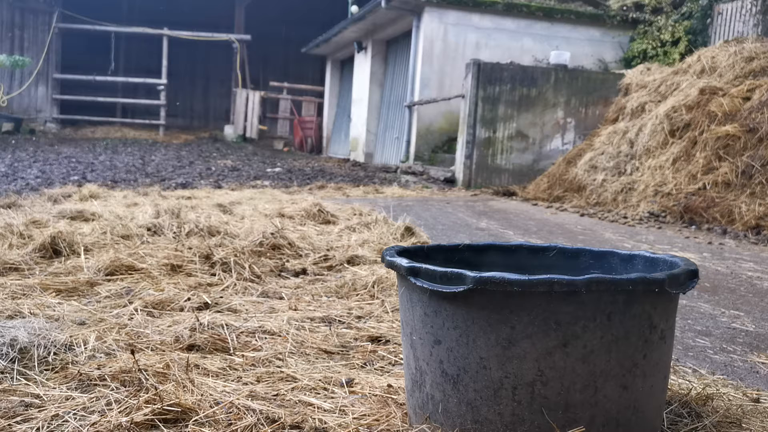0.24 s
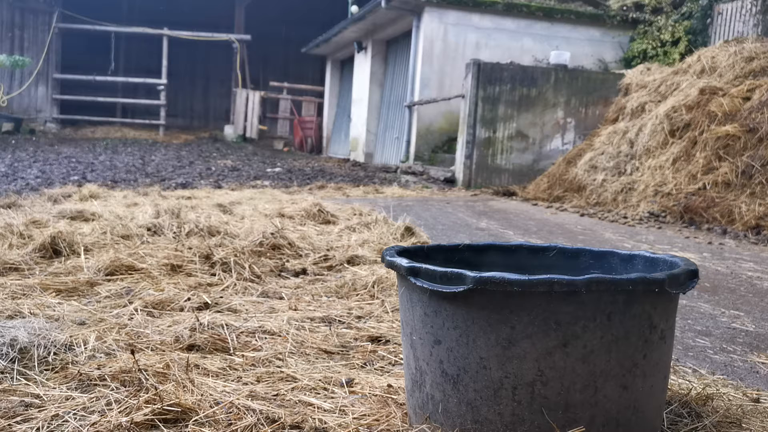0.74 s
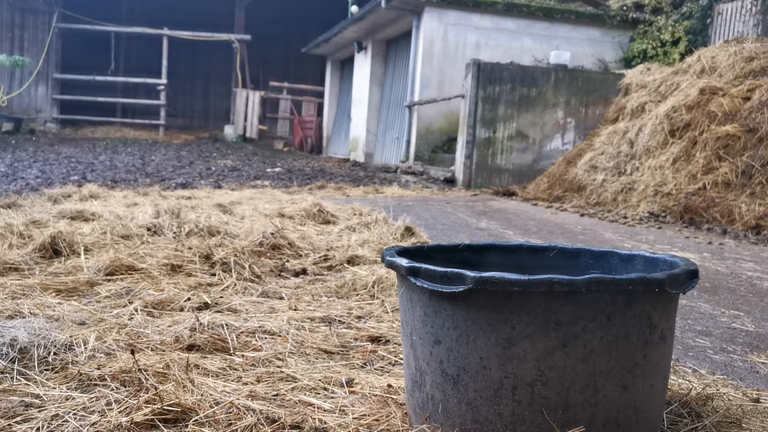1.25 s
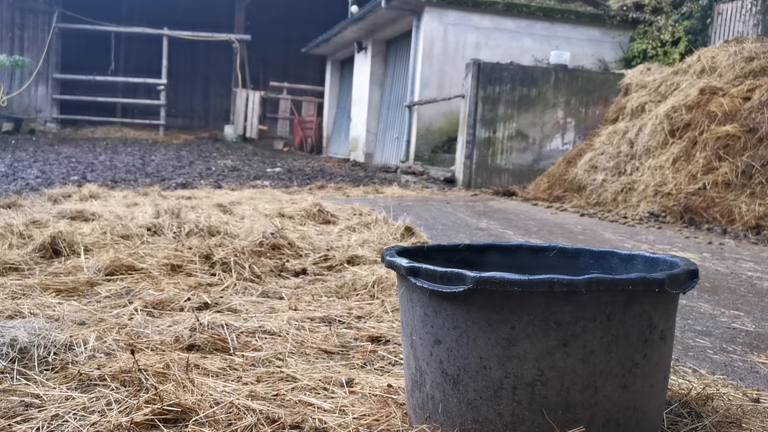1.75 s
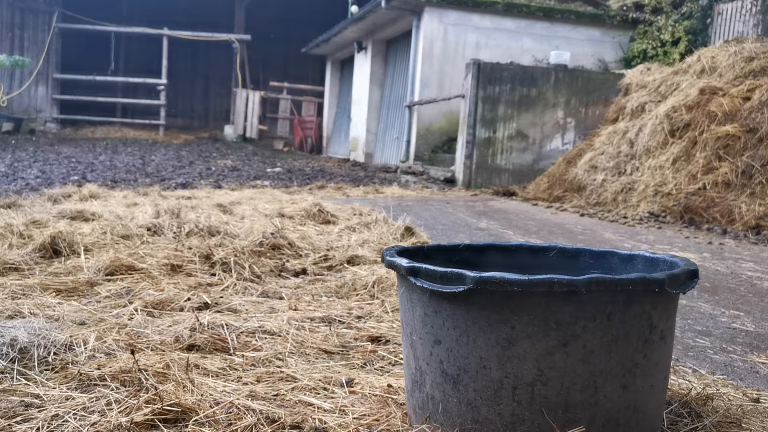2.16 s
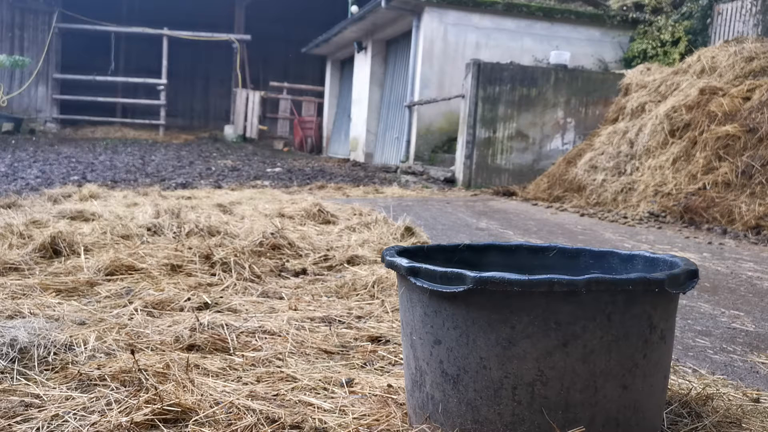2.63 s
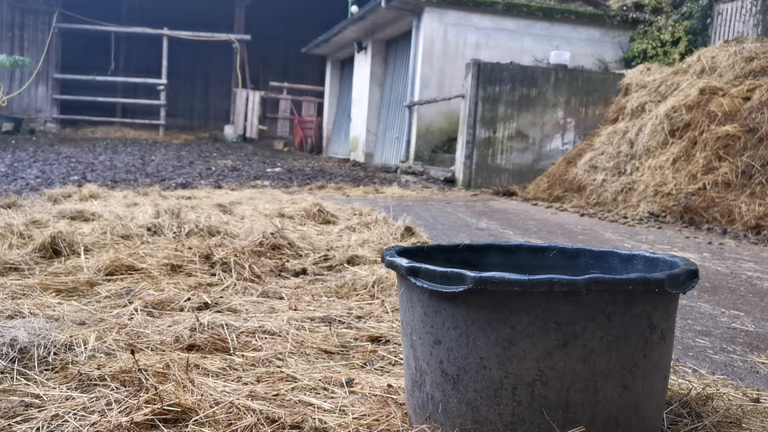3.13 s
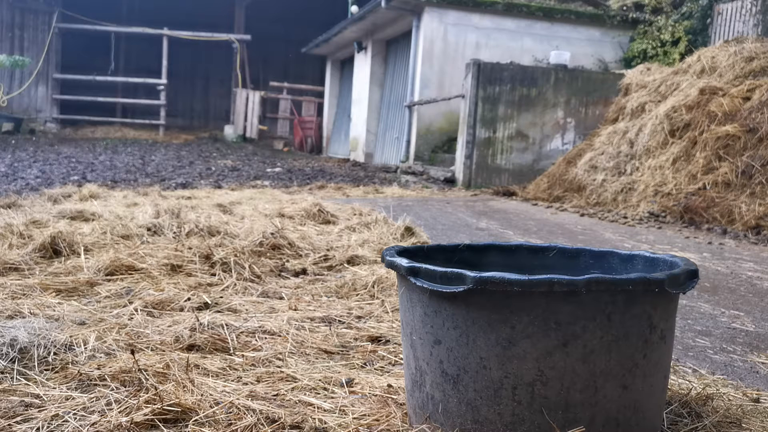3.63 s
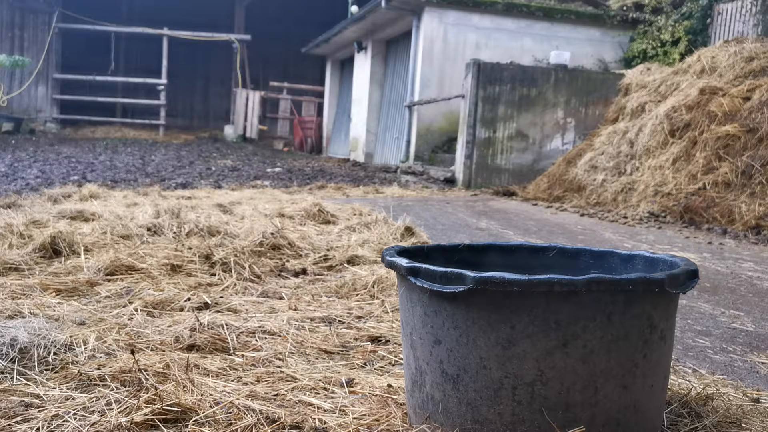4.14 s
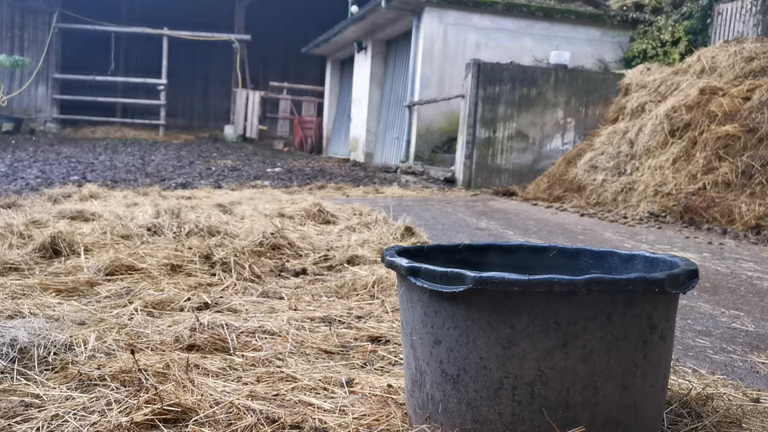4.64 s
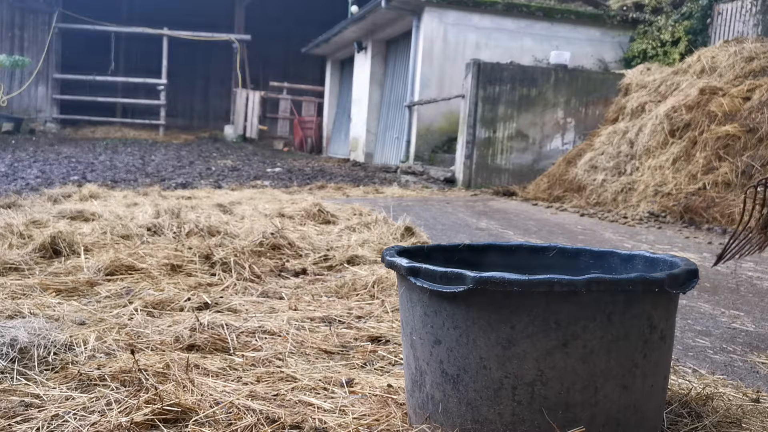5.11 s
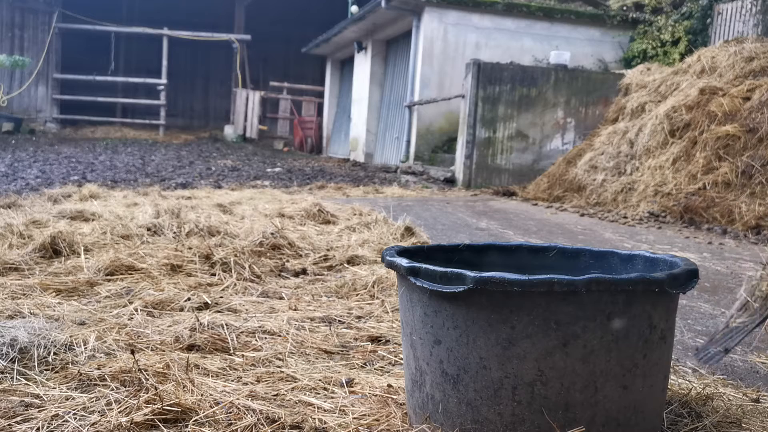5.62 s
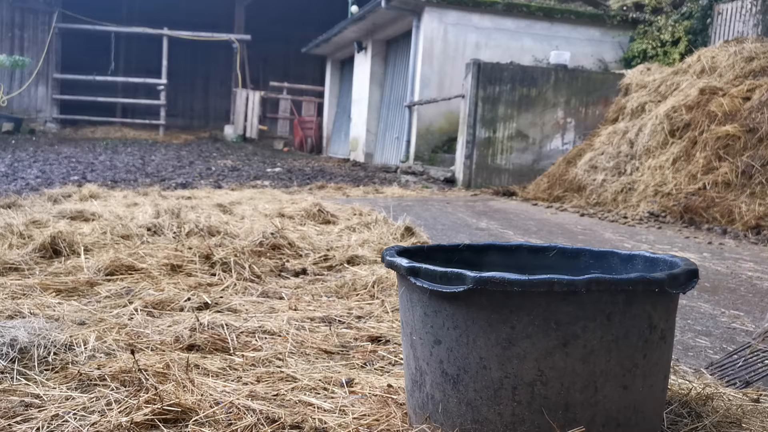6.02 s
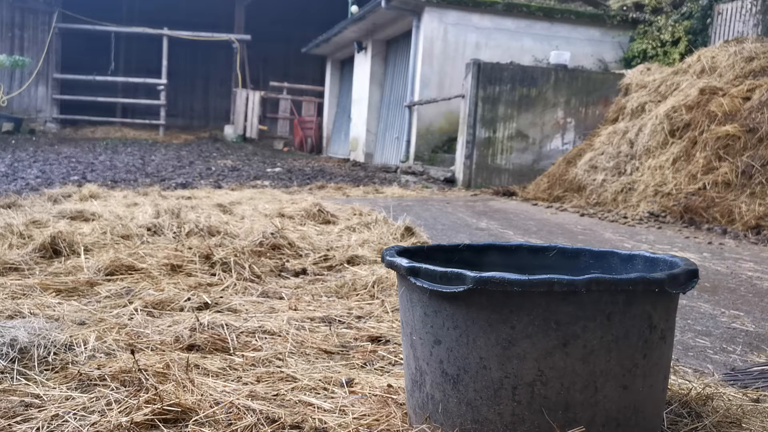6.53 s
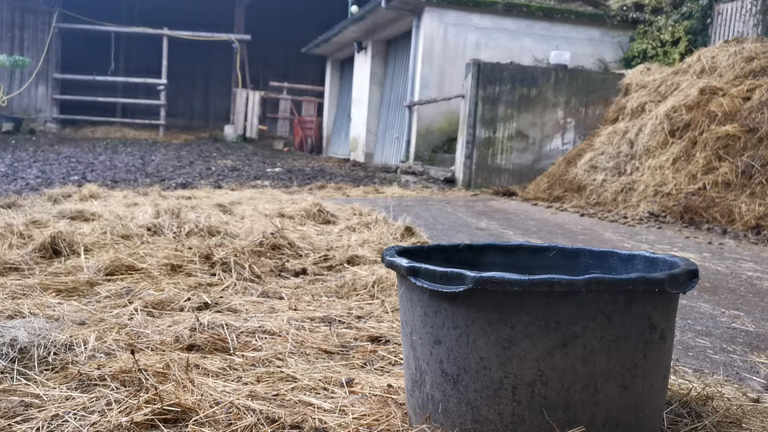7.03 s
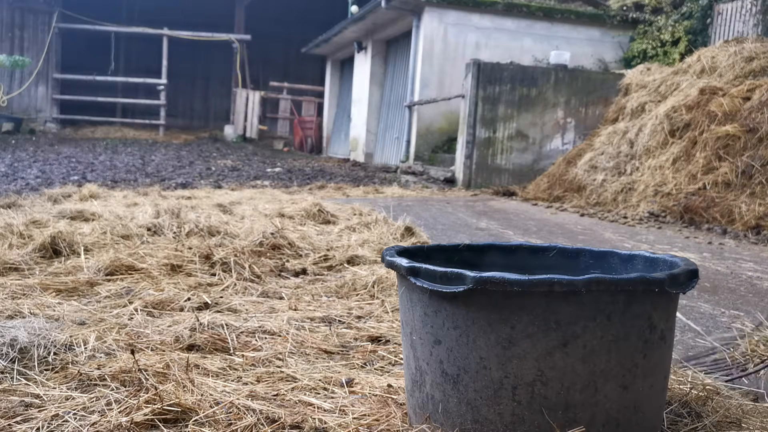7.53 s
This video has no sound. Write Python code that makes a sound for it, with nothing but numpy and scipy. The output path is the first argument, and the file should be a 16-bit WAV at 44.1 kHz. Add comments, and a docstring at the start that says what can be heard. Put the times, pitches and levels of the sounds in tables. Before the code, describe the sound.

Faint fading steel ring over quiet outdoor hum, then tines tick and two loud hollow plastic knocks land around one second. Rapid metallic clicks and short gritty scrapes follow, with further heavy thumps and rumbling before four seconds. A near-quiet stretch holds only soft straw stirring and tiny ticks, until a rough tine scrape at seven seconds. Close, dry stereo pickup with slight wall reflections.

```python
"""A rough ring of steel fades over low distant hum and air, then tines click in an open stable yard.
Close to the microphone a steel fork scrapes concrete and straw and knocks a hollow plastic barrow, which
rumbles under its load; later come faint straw and one long drag of the tines. Clicks and noise drive resonances
of tines and barrow walls; the squeal is a wandering tone with multiples. A short wall echo reaches two ports."""
import sys
import numpy as np
from scipy import signal
from scipy.fft import rfft, irfft
from scipy.io import wavfile

SR = 44100
rng = np.random.default_rng(int(sys.argv[2]) if len(sys.argv) > 2 else 0)


def wav_record(signal):
    """Record a signal, one row per channel, as 16-bit PCM in the file named by sys.argv[1]."""
    frames = np.transpose(np.atleast_2d(signal))
    bounded = np.clip(frames, -1, 1)
    # unit amplitude maps onto the largest positive 16-bit level
    quanta = np.round(bounded * 32767).astype(np.int16)
    wavfile.write(sys.argv[1], SR, quanta)


N = 342657   # samples

# Distant hum and air, spectrum: (frequency [Hz], level [dB])
AIR_SPECTRUM = [(12, -23), (20, 6.5), (59, 6.5), (161, -4.5), (534, -6.5), (767, -9.5), (1380, -10.5),
                (3000, -15), (4310, -20.5), (7310, -19.5), (9930, -36), (15500, -40)]
# Likeness of the air at the two ports: (frequency [Hz], correlation [anything below 0 plays as unrelated])
AIR_LIKENESS = [(60, 0.68), (380, 0.73), (2380, 0.43), (15000, -0.27)]
AIR_LEVEL_DB = -61.5
# Ring of steel already fading at the start: (frequency [Hz], starting level [dB], t60 [s])
FADING_RING = (1820, -59.5, 1)

# Modes of the fork's tines: (frequency [Hz], level [dB])
TINE_MODES = [(1090, -4), (1240, -6), (1580, -6), (1750, -7), (2170, -3), (2440, -1), (2560, -4),
              (2780, -8), (3090, -8), (3340, -6), (3620, -1), (3900, -3), (4400, -9), (5100, -13),
              (6010, -13)]
TINES_T60_S = 0.077
# Spectrum of the grit on concrete: (frequency [Hz], level [dB per Hz])
GRIT_SPECTRUM = [(300, -4), (660, 5), (820, -7.5), (1050, 1), (1500, 4), (2400, 1.5), (4500, 0.5),
                 (5800, 1), (7250, 6), (9800, -18), (15500, -30.5)]
# Fork strokes over concrete and straw: (time [s], held for [s], grit level [dB], straw hiss level [dB])
SCRAPE_STROKES = [(0.50, 0.05, -58, -66), (0.69, 0.049, -56, -63), (0.76, 0.2, -55, -60.5),
                  (0.91, 0.019, -41.5, -56.5), (1.02, 0.1, -53.5, -65.5), (1.72, 0.11, -57.5, -72),
                  (1.955, 0.033, -56, -70.5), (2.03, 0.048, -59, -74), (2.23, 0.23, -50.5, -63.5),
                  (2.49, 0.12, -46, -53.5), (2.85, 0.15, -57.5, -67.5), (3.06, 0.091, -54, -64),
                  (3.41, 0.11, -51, -59), (3.60, 0.13, -51, -84), (3.81, 0.15, -45.5, -64.5),
                  (4.79, 0.073, -67.5, -60), (5.03, 0.51, -68, -74), (5.87, 0.013, -61.5, -60)]
# Fall after a stroke, one row each for grit and hiss, the hiss stopping first: (fall [dB/s])
SCRAPE_FALL_DB_PER_S = [
    [237],
    [449],
]
SCRAPE_RISE_DB_PER_S = 300
# Straw stirring between strokes: (grit level [dB], hiss level [dB])
RUSTLE_LEVELS = (-69.5, -79.5)
# Smooth swishes of straw sliding off the tines: (time [s], held for [s], level [dB])
SWISHES = [(1.73, .12, -65.5), (2.03, 0.058, -66)]
SWISH_HZ, SWISH_WIDTH_HZ = 6910, 80

# Tines and stones clicking: (time [s], level [dB], centre [Hz], t60 [s])
TICKS = [(0.2596, -33, 3100, 0.058), (0.463, -21.5, 1770, 0.043), (0.5176, -33, 2880, 0.017),
         (.545, -42.5, 2800, 0.075), (0.7528, -36, 4140, 0.045), (0.9038, -27, 1050, 0.2),
         (0.926, -30.5, 2100, 0.07), (1.017, -34.5, 3900, 0.033), (1.059, -22.5, 1380, 0.084),
         (1.8457, -40, 1390, 0.13), (2.241, -22, 2250, 0.021), (2.276, -23, 2510, 0.021),
         (2.288, -27, 2580, 0.11), (2.345, -22, 2560, 0.01), (2.382, -21, 2630, 0.019),
         (2.4028, -30.5, 2570, 0.072), (2.4357, -29.5, 2400, 0.077), (2.4857, -27, 2140, 0.05),
         (2.493, -27.5, 2250, 0.078), (2.505, -26, 2200, 0.078), (2.5406, -27.5, 1980, 0.088),
         (2.561, -27, 2300, 0.046), (2.604, -28, 4230, 0.023), (2.6148, -25, 1750, 0.0092),
         (2.695, -41, 1670, 0.077), (2.733, -48, 2200, 0.054), (2.829, -26, 2080, 0.052),
         (2.928, -33.5, 2300, 0.04), (2.948, -24, 2590, 0.028), (3.014, -34.5, 3900, 0.014),
         (3.048, -30.5, 1940, 0.16), (3.1088, -29.5, 1900, 0.038), (3.128, -29.5, 1750, 0.056),
         (3.3227, -40, 7500, 0.035), (3.5538, -28.5, 1550, 0.12), (3.792, -19, 2720, 0.062),
         (3.806, -17, 2840, 0.077), (3.897, -26, 2650, 0.067), (4.079, -43, 2560, 0.016),
         (4.827, -35.5, 7700, 0.053), (5.314, -43, 8550, 0.14), (5.876, -51.5, 3300, 0.13),
         (5.9124, -46, 3200, 0.085), (6.024, -47.5, 2150, 0.062), (6.069, -44.5, 2340, 0.13),
         (6.5442, -49, 2460, 0.14), (6.79, -51.5, 2900, 0.035), (7.5516, -36.5, 4500, 0.082),
         (7.6009, -33, 6900, 0.04), (7.621, -40, 4440, 0.021), (7.637, -40.5, 6550, 0.018)]
# Tilt of all the clicks: (frequency [Hz], level [dB])
TICK_SPECTRUM = [(300, 6.5), (6000, -11), (7200, -7.5), (8500, -21), (10500, -32), (15500, -42.5)]
# Wall modes of the hollow barrow: (frequency [Hz], level [dB])
BARROW_MODES = [(100, 4.5), (138, 4), (165, 2), (205, -7.5), (255, -10), (323, -6), (405, -5.5), (433, -3),
                (522, -7.5), (580, -13.5), (700, -12), (845, -9), (1065, -6), (1340, -4)]
BARROW_T60_S = 0.11   # for a damping of 1; the walls have it at 400 Hz
# Blows on the barrow: (time [s], peak level [dB], pitch struck [Hz], damping [times the free decay rate])
KNOCKS = [(.308, -31.5, 660, 0.82), (0.333, -39, 570, 0.46), (.9, -10, 544, 2.2), (1.06, -8.5, 398, 0.61),
          (1.29, -37, 130, 1.1), (1.65, -40, 137, 4.4), (1.956, -34, 138, 0.79), (2.035, -33.5, 169, 0.87),
          (2.827, -23, 800, 2.2), (3.048, -35.5, 132, 0.51), (3.5534, -10, 210, 1.4),
          (3.674, -25.5, 850, 0.7), (3.743, -28, 1020, 0.7), (3.792, -16, 690, 0.35),
          (3.895, -21.5, 930, 0.35), (4.563, -51, 540, 0.4), (4.59, -49.5, 255, 0.72),
          (4.82, -52.5, 180, 1.2), (5.305, -50, 130, 1.6)]
# Tines singing as they slip: (time [s], level [dB], frequency [Hz], length [s])
CHINKS = [(0.689, -30.5, 2600, 0.027), (0.698, -40.5, 1730, 0.038), (2.027, -51.5, 2120, 0.12),
          (3.447, -38, 2210, 0.1), (3.81, -34, 2100, 0.08), (6.071, -52, 1350, 0.083),
          (6.183, -49.5, 1380, 0.058), (7.327, -40, 656, 0.18), (7.459, -27.5, 3896, 0.031),
          (7.542, -43, 2480, 0.04), (7.601, -36.5, 4020, 0.016), (7.667, -48.5, 3960, 0.019)]
# Shoves on the barrow: (time [s], held for [s], rumble [dB], upper-wall rattle [dB], deep shudder [dB])
RUMBLE_SHOVES = [(0.70, 0.23, -57, -74, -62), (0.94, 0.013, -33.5, -45, -43.5),
                 (1.10, 0.087, -40.5, -57, -42), (1.64, 0.13, -53.5, -71, -58),
                 (1.83, 0.016, -47.5, -46.5, -57), (2.04, 0.065, -50, -51, -64),
                 (2.24, 0.25, -46, -58.5, -61), (2.50, 0.091, -45.5, -60, -49.5),
                 (3.09, 0.059, -43, -54, -51.5), (3.44, 0.12, -56, -54.5, -50.5),
                 (3.63, 0.11, -38, -46.5, -55), (3.82, 0.04, -35.5, -37.5, -37),
                 (3.93, 0.031, -35, -37, -39), (4.60, 0.063, -72, -65, -78), (7.37, 0.11, -57.5, -64, -62)]
# Fall after a shove, one row each for rumble, rattle and shudder: (fall [dB/s])
RUMBLE_FALL_DB_PER_S = [
    [146],
    [207],
    [107],
]
RUMBLE_RISE_DB_PER_S = 243

# The long drag of the tines: (time [s], level [dB])
DRAG = [(7.03, -65.5), (7.09, -62.5), (7.12, -40), (7.192, -42.5), (7.214, -34.5), (7.266, -41),
        (7.318, -32), (7.384, -37.5), (7.398, -34.5), (7.418, -44.5), (7.46, -43.5), (7.47, -38.5),
        (7.498, -54), (7.53, -52)]
DRAG_LOW_HZ, DRAG_TAIL_DB_PER_S = 670, 55   # bass cut; fall after the last point
# Rate of the rough stick-slip squeal: (time [s], slips per second [Hz])
SQUEAL_RATE = [(7.1, 1090), (7.26, 1170), (7.3, 1240), (7.43, 1215)]
# First four multiples of the squeal, against the grit: (level [dB])
SQUEAL_MULTIPLES = [-12.5, -13, -7.5, -10]
SQUEAL_WANDER = .035   # spread, share of pitch
# A breath of wind on the ports: (time [s], level [dB])
GUST = [(7.3, -81), (7.4, -59), (7.6, -53.5), (7.77, -72)]

ECHO_DB, ECHO_LOW_HZ, ECHO_T60_S = -11, 3240, .03   # scattered near reflections
# How the two ports hear differently: (frequency [Hz], left minus right [dB])
PORT_LEAN = [(60, 0), (150, -1.5), (380, -1.5), (950, -2.5), (2380, -6), (5980, -1.5), (8000, 5),
             (15000, 6)]
WIDE_DB, WIDE_LOW_HZ = -6, 4010   # treble of the broad scraped patch
CUTOFF_HZ = 15700   # from here up the top is 70 dB down


def from_db(db):
    """Level in dB to a factor."""
    return 10 ** (np.asarray(db) / 20)


def rms_one(x):
    """Scale to an rms of 1."""
    return x / np.sqrt(np.mean(x ** 2) + 1e-20)


def in_time(rows):
    """Draw straight lines between the rows of a time table, one per column."""
    s, *columns = np.transpose(rows)
    return [np.interp(np.arange(N) / SR, s, c) for c in columns]


def at_hz(points, hz):
    """Read a frequency table along a logarithmic scale."""
    table_hz, values = np.transpose(points)
    return np.interp(np.log(hz), np.log(table_hz), values)


def drift(rate_hz):
    """Slow chance with an rms of 1, computed at every 40th sample."""
    r = np.exp(-80 * np.pi * rate_hz / SR)
    chance = rng.standard_normal(N // 40 + 2002)
    slow = signal.lfilter([1], [1, -2 * r, r * r], chance)[2000:]   # start-up dropped
    return np.interp(np.arange(N) / 40, np.arange(len(slow)), rms_one(slow))


def colour(x, spectrum, share=1):
    """Causal (minimum-phase) filter that follows a share of a dB table."""
    level_db = share * at_hz(spectrum, np.linspace(1, SR / 2, 2049))
    cepstrum = irfft(np.log(from_db(level_db)))
    cepstrum[1:2048] *= 2   # fold the backward half onto the forward one
    cepstrum[2049:] = 0
    return signal.fftconvolve(x, irfft(np.exp(rfft(cepstrum))))[:N]


def ring(push, hz, t60):
    """A mode as a two-pole resonance: a unit click starts a dying sine of height about 1."""
    r, w = from_db(-60 / (t60 * SR)), 2 * np.pi * hz / SR
    return signal.lfilter([0, np.sin(w)], [1, -2 * r * np.cos(w), r * r], push + 1e-18)


def resonate(x, hz, q):
    """Pass the band round one pitch; a high q is narrow."""
    return signal.lfilter(*signal.iirpeak(hz, q, fs=SR), x)


def grains(per_s, uneven_db):
    """Random clicks of uneven size and either sign, rms 1."""
    sizes = from_db(uneven_db * np.minimum(rng.exponential(1, N), 5))
    signs = rng.choice([-1, 1], N)
    return rms_one(sizes * signs * (rng.random(N) < per_s / SR))


def split(x, hz):
    """Low and high part."""
    return [signal.sosfilt(signal.butter(4, hz, kind, fs=SR, output="sos"), x) for kind in ("low", "high")]


def add(out, s, sound):
    """Mix a sound in at a time in seconds."""
    i = round(s * SR)
    out[i:i + len(sound)] += sound[:N - i]


def strokes(rows, rise_db_per_s, fall_db_per_s):
    """Each stroke swells, holds and dies; powers add. One gain per level column."""
    t, power = np.arange(N) / SR, 0
    for s, held, *db in rows:
        rise_loss = rise_db_per_s * np.maximum(s - t, 0)
        fall_loss = np.array(fall_db_per_s) * np.maximum(t - s - held, 0)
        power = power + from_db(np.array(db)[:, None] - rise_loss - fall_loss) ** 2
    return np.sqrt(power)


def air():
    """Distant hum and air: half-octave bands of stereo noise, each with its own likeness, then coloured."""
    out, edges = 0, 20 * 2 ** np.arange(0, 9.8, .5)
    white = rng.standard_normal((2, 2, N))   # neighbouring bands use different noise
    for k, (low, high) in enumerate(zip(edges, edges[1:])):
        band = signal.butter(2, [low, high], "band", fs=SR, output="sos")
        mid, side = signal.sosfilt(band, white[k % 2])
        alike = np.clip(at_hz(AIR_LIKENESS, np.sqrt(low * high)), 0, 1)
        out = out + np.sqrt(1 + alike) * mid + np.sqrt(1 - alike) * side * [[1], [-1]]
    return from_db(AIR_LEVEL_DB) * rms_one(np.array([colour(port, AIR_SPECTRUM) for port in out]))


def fading_ring():
    """A rough ring of steel dying away at the start: noise through one narrow mode."""
    hz, db, t60 = FADING_RING
    fade = from_db(db - 60 * np.arange(N) / SR / t60)
    return fade * rms_one(ring(rng.standard_normal(N), hz, TINES_T60_S))


def grit(per_s, clump_db, ring_db):
    """Dense clumped clicks of grit, heard directly and through the tines, whose modes flare in turn."""
    clicks = grains(per_s, uneven_db=1.5) * from_db(clump_db * drift(36))
    ringing = sum(from_db(db + 4.5 * drift(30)) * rms_one(ring(clicks, hz, TINES_T60_S))
                  for hz, db in TINE_MODES)
    direct = rms_one(colour(clicks, GRIT_SPECTRUM))
    return rms_one(direct + from_db(ring_db) * rms_one(ringing))


def scraping():
    """Short strokes over a faint rustle: low grit and high straw hiss, plus swishes of narrow noise."""
    gains = strokes(SCRAPE_STROKES, SCRAPE_RISE_DB_PER_S, SCRAPE_FALL_DB_PER_S)
    grit_gain, hiss_gain = np.hypot(gains, from_db(RUSTLE_LEVELS)[:, None])
    low, high = split(grit(per_s=2500, clump_db=3, ring_db=-9), 3500)
    swish = resonate(rng.standard_normal(N), SWISH_HZ, SWISH_HZ / SWISH_WIDTH_HZ)
    swish_gain = strokes(SWISHES, SCRAPE_RISE_DB_PER_S, SCRAPE_RISE_DB_PER_S)[0]
    return grit_gain * rms_one(low) + hiss_gain * rms_one(high) + swish_gain * rms_one(swish)


def ticks():
    """Each click is a dying puff of noise: a body round its pitch, a broad crack and a chink of two steel modes."""
    out, t = np.zeros(N), np.arange(SR // 6) / SR
    for s, db, hz, t60 in TICKS:
        puff = rng.standard_normal(len(t)) * from_db(-60 * t / t60) * (1 - np.exp(-t / .0003))
        puff[0] = rng.choice([-1, 1]) * from_db(8)   # the first sharp contact
        body = resonate(puff, hz, 1.1)
        other_hz = rng.choice(TINE_MODES[4:])[0]   # some other tine wakes too
        chink = resonate(puff, hz, 12) + resonate(puff, other_hz, 12)
        add(out, s, from_db(db) * (from_db(2) * body + from_db(10) * chink + from_db(-4) * puff))
    return colour(split(out, 563)[1], TICK_SPECTRUM)


def knocks():
    """A blow sets off the wall modes, most of all those near the pitch struck, and a thud of the shaken load."""
    out, t = np.zeros(N), np.arange(SR // 2) / SR
    hz, level_db = np.transpose(BARROW_MODES)[:, :, None]
    t60 = BARROW_T60_S * (hz / 400) ** -.3   # high modes die sooner
    for s, db, struck_hz, damping in KNOCKS:
        chance = rng.standard_normal((3, len(BARROW_MODES), 1))
        octaves_off = abs(np.log2(hz / struck_hz))
        strength = from_db(level_db - 8.9 * octaves_off + 2 * chance[0])
        # pitches scatter a little, and the walls do not all start in step
        phase = 2 * np.pi * hz * (1 + .01 * chance[1]) * t + .5 * chance[2]
        walls = (strength * np.sin(phase) * from_db(-60 * t * damping / t60)).sum(0)
        thud = resonate(rng.standard_normal(len(t)), struck_hz, 1)
        thud = rms_one(split(thud, 990)[0]) * from_db(-60 * t * damping / BARROW_T60_S)
        both = walls / abs(walls).max() + from_db(-9) * thud
        soft_contact = 1 - np.exp(-(t / 0.00093) ** 2)
        blow = split(both * soft_contact, 113.5)[1]   # no deep bass
        add(out, s, -from_db(db) * blow / abs(blow).max())
    return out


def chinks():
    """A short slip rubs one tine mode most: noise through narrow resonances, quick rise, slower fall."""
    out = np.zeros(N)
    for s, db, hz, length in CHINKS:
        done = np.arange(SR // 5) / SR / length
        rub, chance = rng.standard_normal(SR // 5), rng.standard_normal(len(TINE_MODES))
        others = sum(from_db(mode_db + 5 * c) * ring(rub, mode_hz, TINES_T60_S)
                     for (mode_hz, mode_db), c in zip(TINE_MODES, chance))
        slip = rms_one(ring(rub, hz, .035)) + from_db(-9) * rms_one(others)
        swell = 4 * done / (1 + 4 * done) * np.exp(-(1.86 * done) ** 2)
        add(out, s, from_db(db) * slip * swell)
    return out


def rumble():
    """Lumpy rubbing drives the same wall modes, damped by the load, and the frame shudders below them."""
    rumble_gain, rattle_gain, deep_gain = strokes(RUMBLE_SHOVES, RUMBLE_RISE_DB_PER_S, RUMBLE_FALL_DB_PER_S)
    rubbing = grains(per_s=1500, uneven_db=2.5) * from_db(2 * drift(21.3))
    # modes flare separately, alternate in sign and keep only .3 of their level differences
    walls = sum((-1) ** k * from_db(.3 * db + 3 * drift(8)) * rms_one(ring(rubbing, hz, .07))
                for k, (hz, db) in enumerate(BARROW_MODES))
    low, high = split(split(walls, 108)[1], 344)
    rattle = split(high, 726)[0]
    deep = rms_one(split(walls, 95)[0]) + from_db(-10) * rms_one(split(rubbing, 85)[0])
    deep = split(deep, 35)[1]
    return rumble_gain * rms_one(low) + rattle_gain * rms_one(rattle) + deep_gain * rms_one(deep)


def squeal():
    """Stick-slip at a wandering rate; each multiple flares on its own."""
    slips_per_s = in_time(SQUEAL_RATE)[0] * (1 + SQUEAL_WANDER * drift(120))
    phase = 2 * np.pi * np.cumsum(slips_per_s) / SR
    return sum(from_db(db + 4.5 * drift(60)) * np.sin((k + 1) * phase)
               for k, db in enumerate(SQUEAL_MULTIPLES))


def drag():
    """The tines drag in uneven jerks: dense grit with a squeal up to the last point, then grit trailing off."""
    t, end = np.arange(N) / SR, DRAG[-1][0]
    level_db = in_time(DRAG)[0] - DRAG_TAIL_DB_PER_S * np.maximum(t - end, 0)
    rub = grit(per_s=4000, clump_db=2, ring_db=-8) + squeal() * (t < end)
    return from_db(level_db) * split(rub, DRAG_LOW_HZ)[1]


def fork_on_floor():
    """The short strokes and rustle, replaced by the long drag once it begins."""
    return np.where(np.arange(N) / SR < DRAG[0][0], scraping(), drag())


def wind():
    """A breath of wind: lumpy low noise round 45 Hz, alike at both ports."""
    low = split(rng.standard_normal(N), 44)[0]
    return from_db(in_time(GUST)[0]) * rms_one(split(low, 45)[1])


def yard(x):
    """Scattered reflections off ground and walls, other ones at each port, plus a dull common tail."""
    t = np.arange(SR // 2) / SR
    scatter = rng.standard_normal((3, len(t)))
    tail = split(scatter[2] * from_db(-60 * t / 0.38), 1170)[0]
    common = x + from_db(-21.5) * signal.fftconvolve(x, tail / np.linalg.norm(tail))[:N]
    near = [split(n * from_db(-60 * t / ECHO_T60_S), ECHO_LOW_HZ)[1] for n in scatter[:2]]
    return [common + from_db(ECHO_DB) * signal.fftconvolve(x, n / np.linalg.norm(n))[:N] for n in near]


def scene():
    """The work near by, heard through the yard at two ports, over air and wind."""
    work = fading_ring() + fork_on_floor() + ticks() + knocks() + chinks() + rumble()
    left, right = yard(work)
    # a separate draw of the fork, opposite in sign at the ports, spreads the treble
    wide = from_db(WIDE_DB) * split(fork_on_floor(), WIDE_LOW_HZ)[1]
    ports = [colour(left + wide, PORT_LEAN, .5), colour(right - wide, PORT_LEAN, -.5)]
    return np.array(ports) + air() + wind()


def record(dry):
    """The microphone signal with its top cut by a steep low-pass."""
    return signal.sosfilt(signal.cheby2(12, 70, CUTOFF_HZ, fs=SR, output="sos"), dry)


dry = scene()
out = record(dry)
wav_record(out)
```